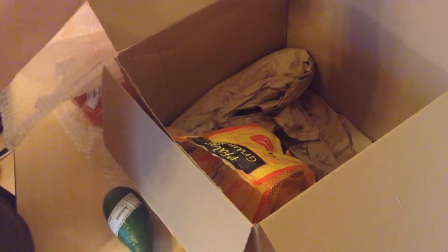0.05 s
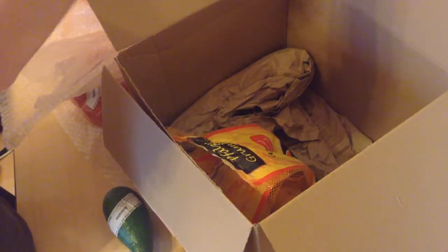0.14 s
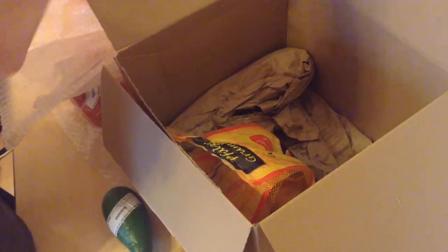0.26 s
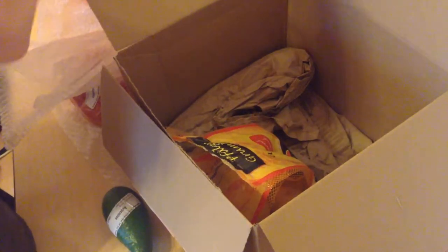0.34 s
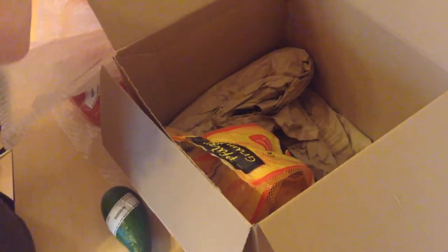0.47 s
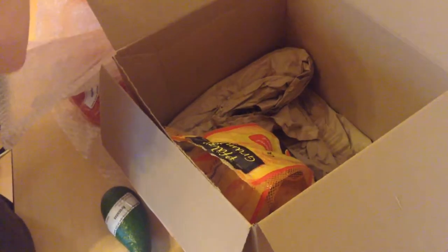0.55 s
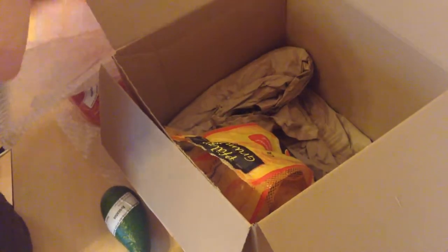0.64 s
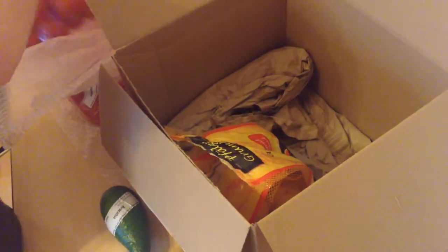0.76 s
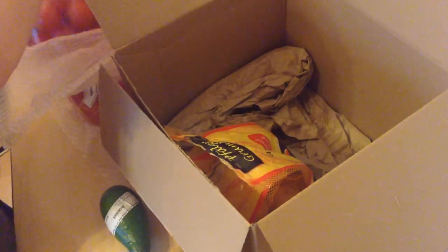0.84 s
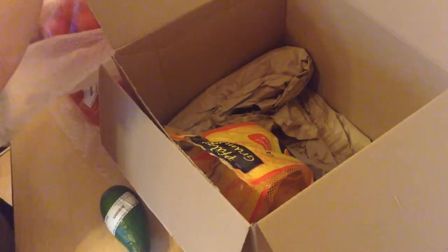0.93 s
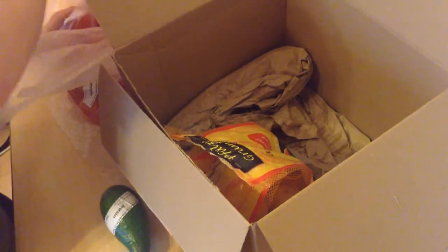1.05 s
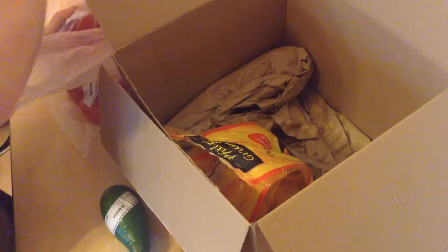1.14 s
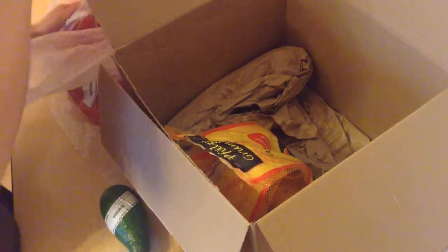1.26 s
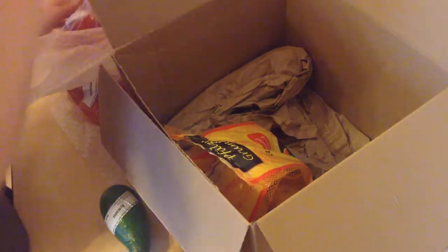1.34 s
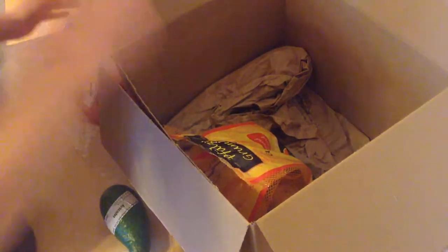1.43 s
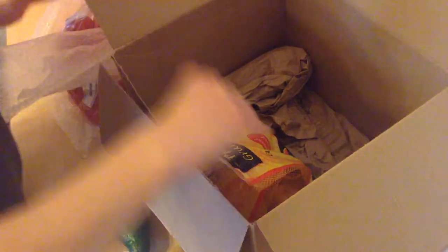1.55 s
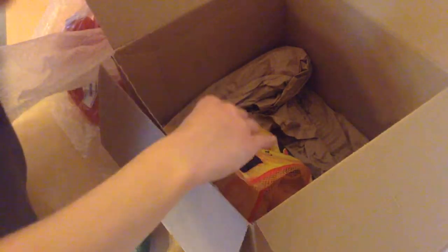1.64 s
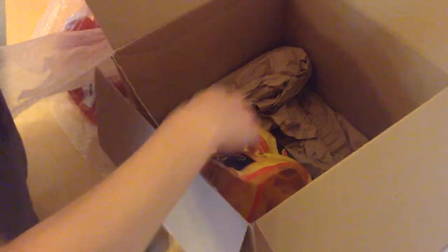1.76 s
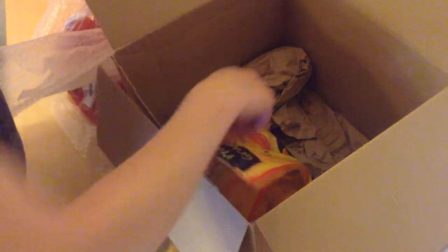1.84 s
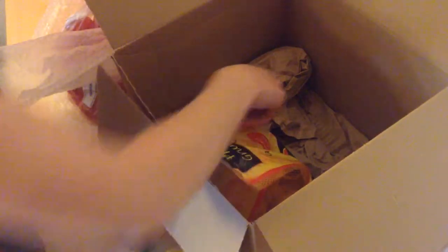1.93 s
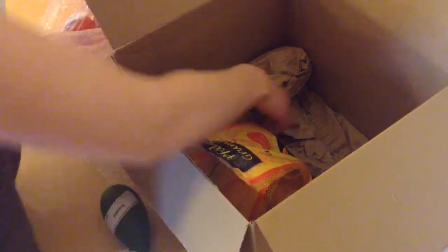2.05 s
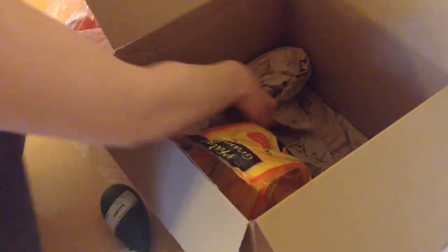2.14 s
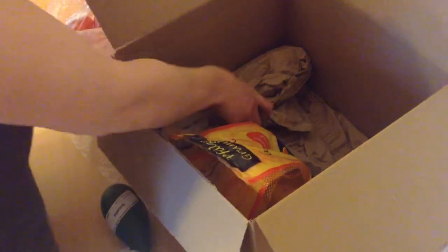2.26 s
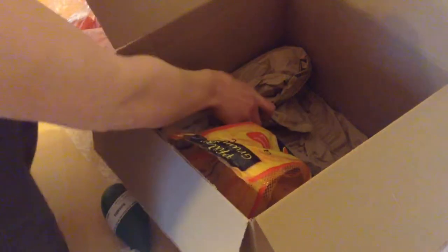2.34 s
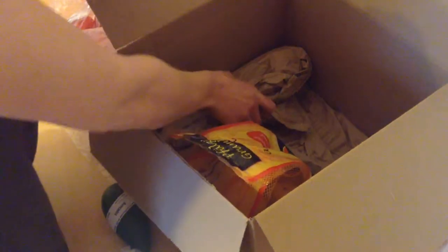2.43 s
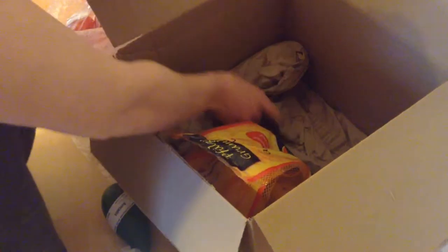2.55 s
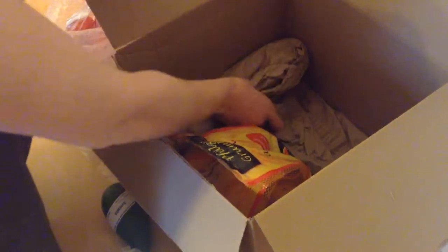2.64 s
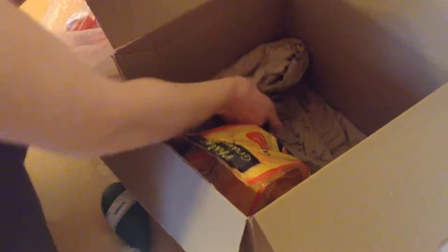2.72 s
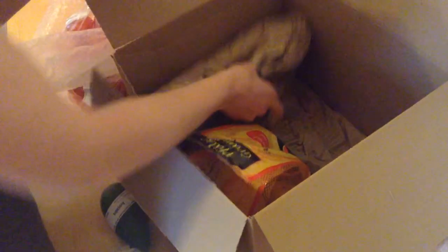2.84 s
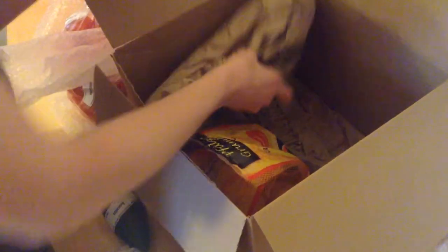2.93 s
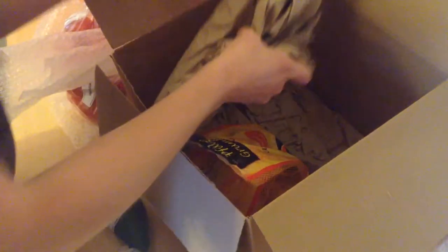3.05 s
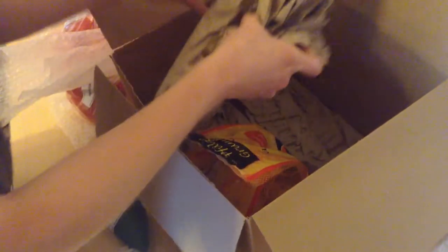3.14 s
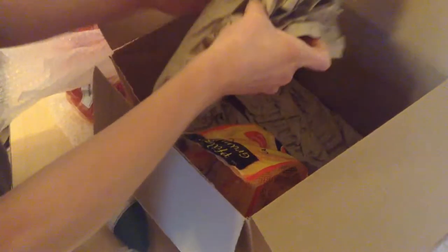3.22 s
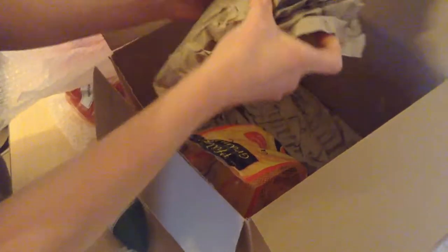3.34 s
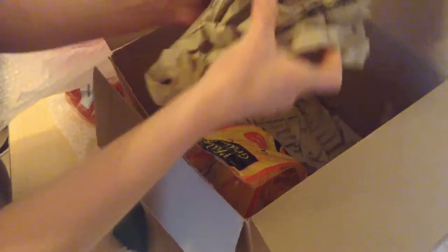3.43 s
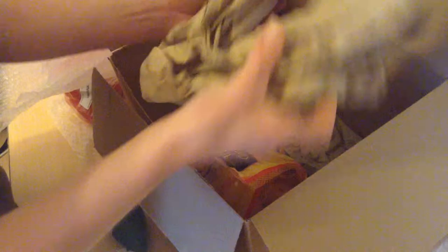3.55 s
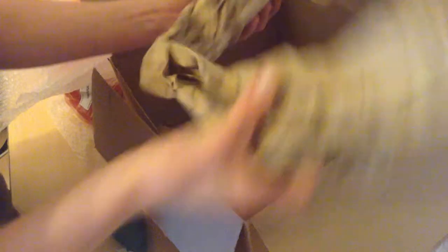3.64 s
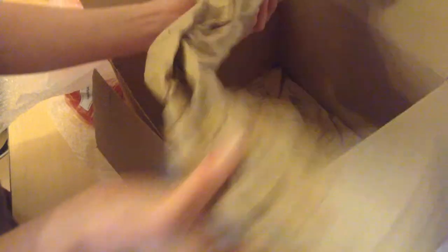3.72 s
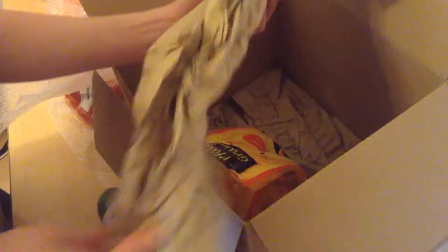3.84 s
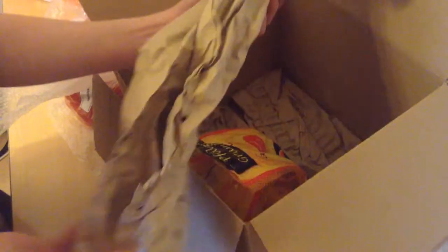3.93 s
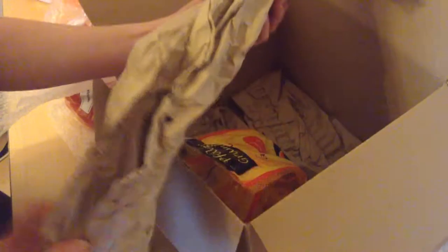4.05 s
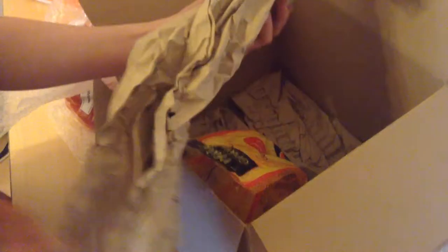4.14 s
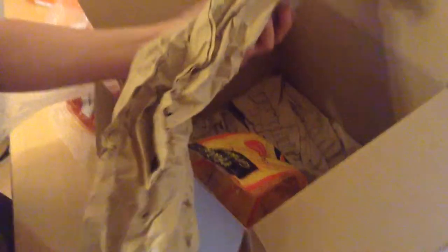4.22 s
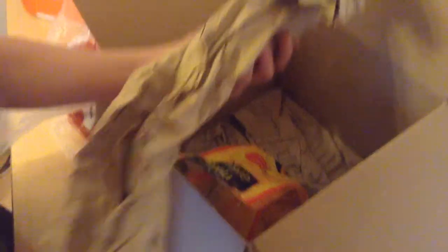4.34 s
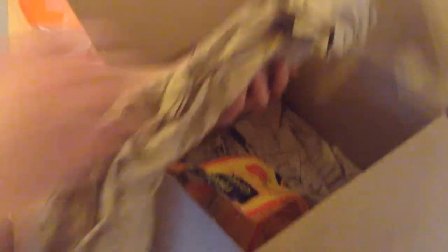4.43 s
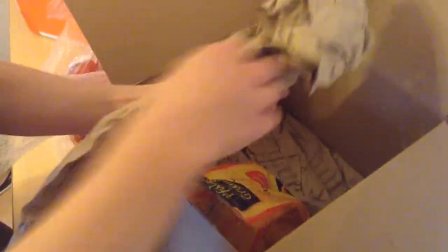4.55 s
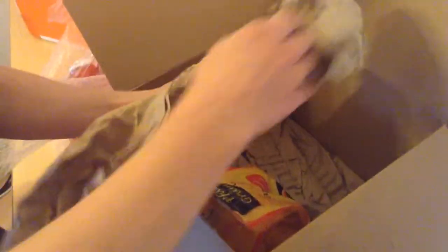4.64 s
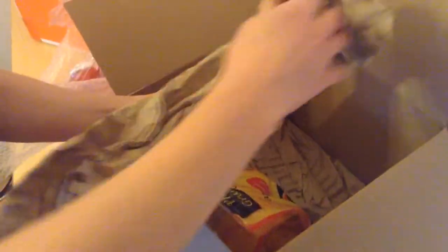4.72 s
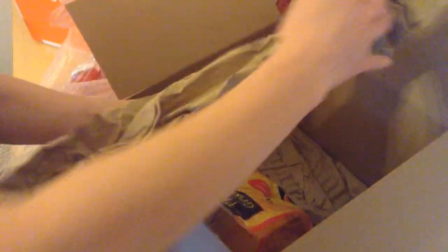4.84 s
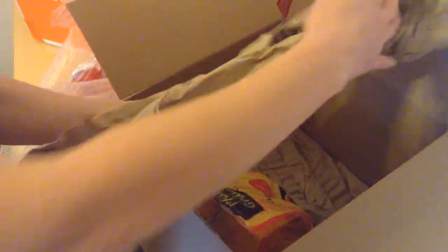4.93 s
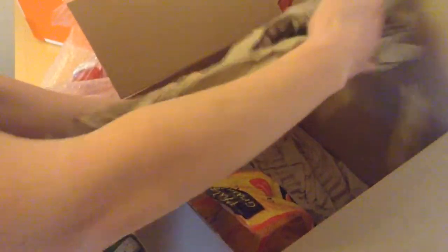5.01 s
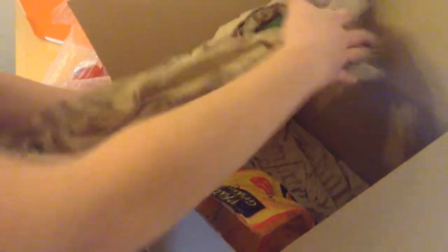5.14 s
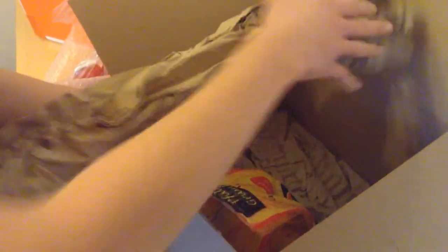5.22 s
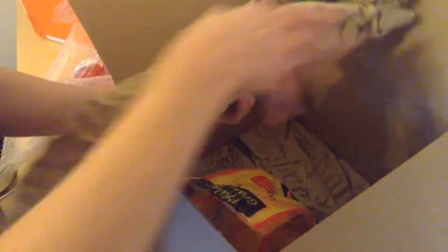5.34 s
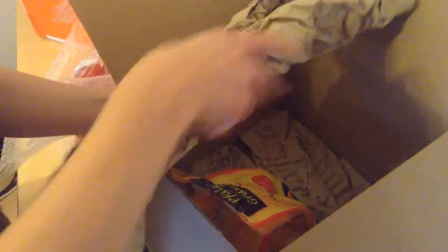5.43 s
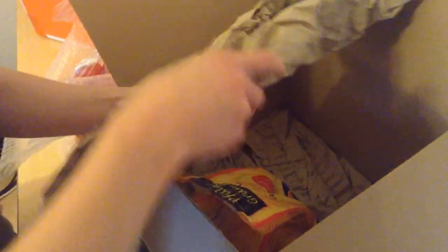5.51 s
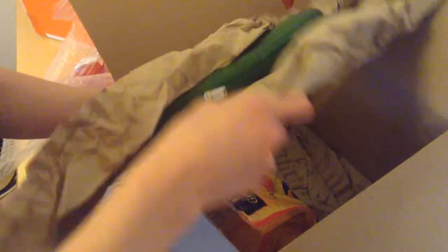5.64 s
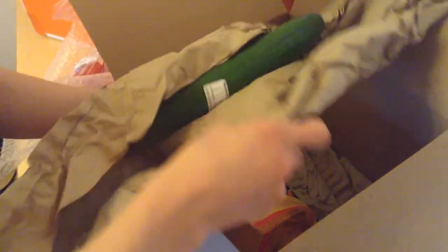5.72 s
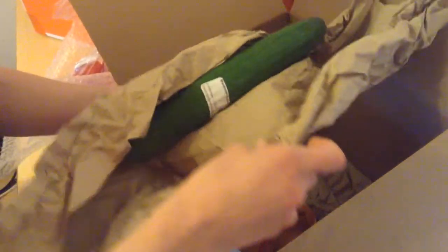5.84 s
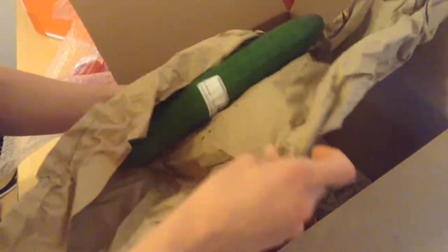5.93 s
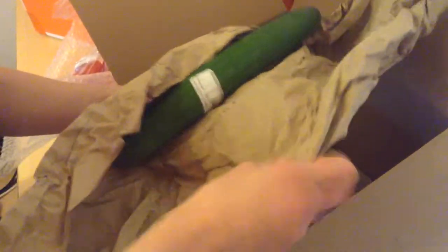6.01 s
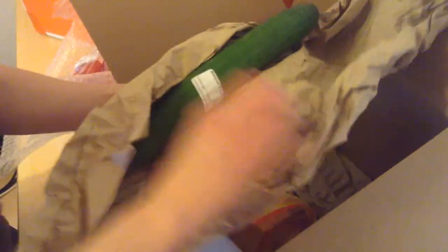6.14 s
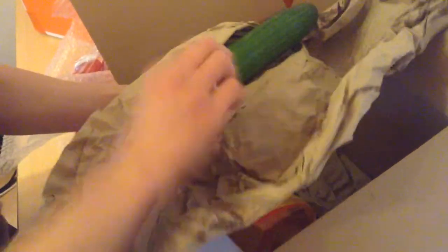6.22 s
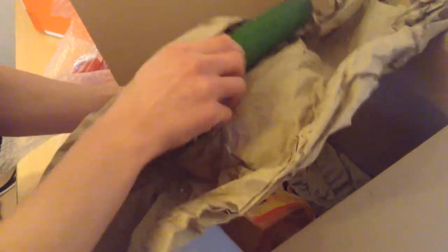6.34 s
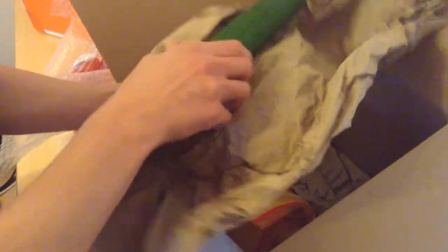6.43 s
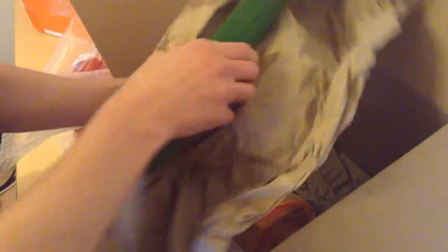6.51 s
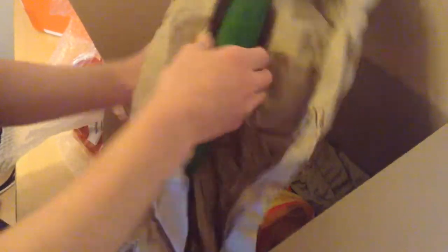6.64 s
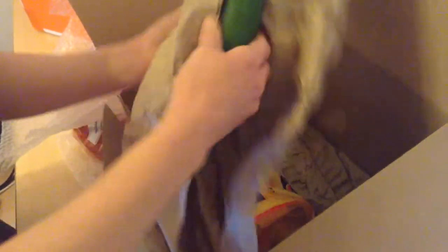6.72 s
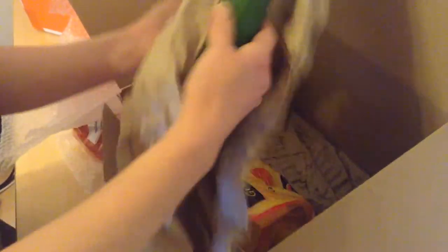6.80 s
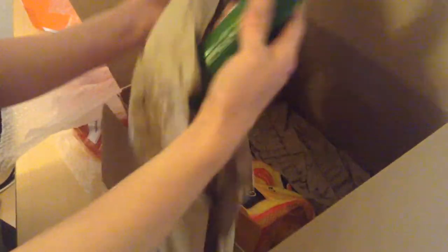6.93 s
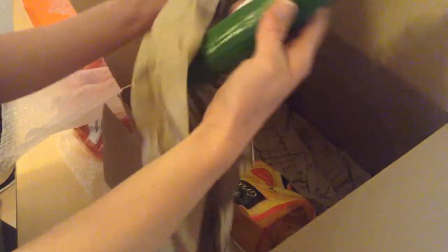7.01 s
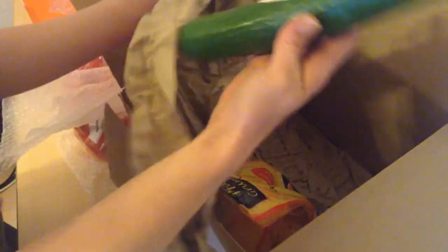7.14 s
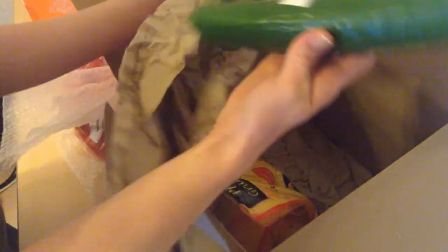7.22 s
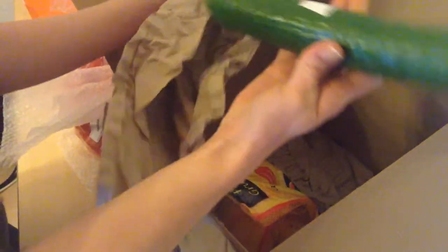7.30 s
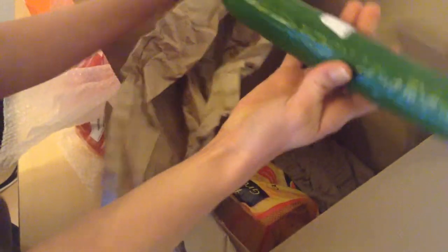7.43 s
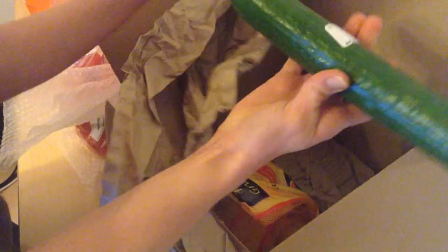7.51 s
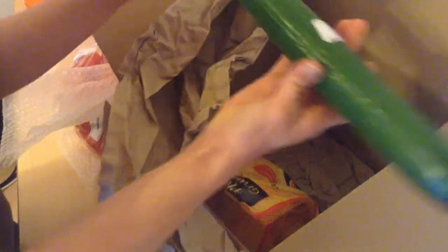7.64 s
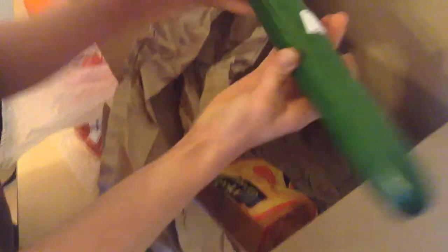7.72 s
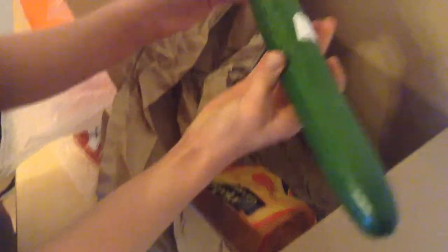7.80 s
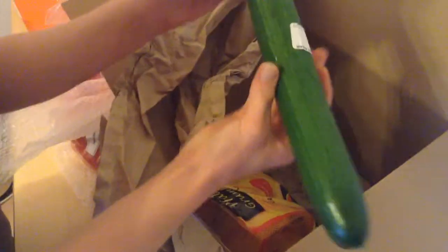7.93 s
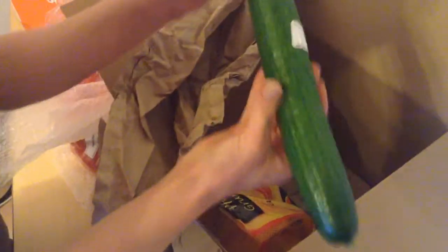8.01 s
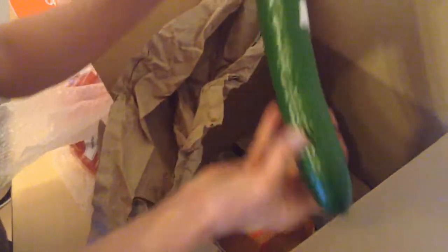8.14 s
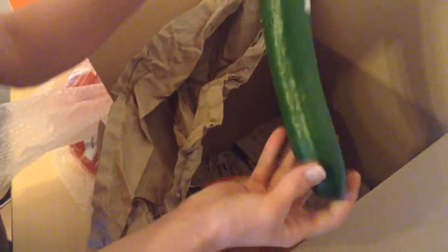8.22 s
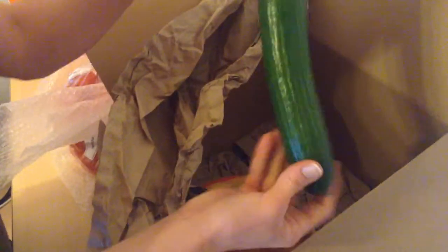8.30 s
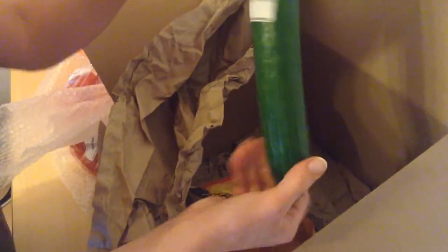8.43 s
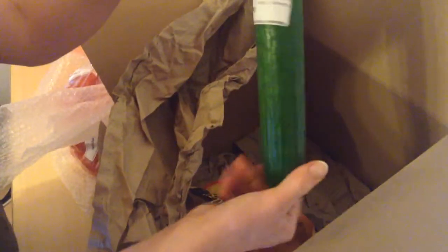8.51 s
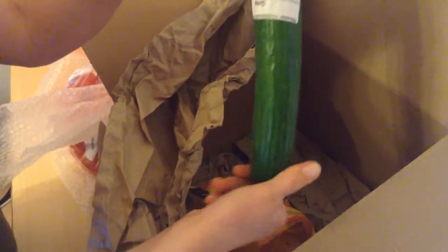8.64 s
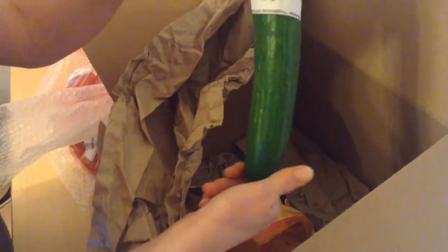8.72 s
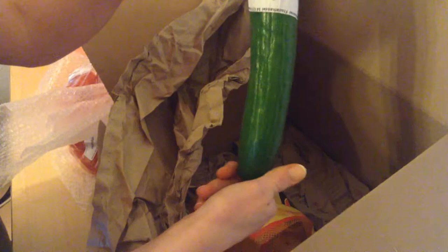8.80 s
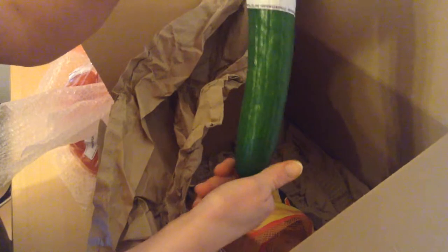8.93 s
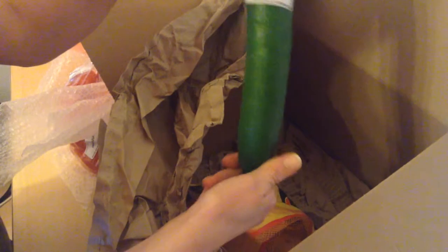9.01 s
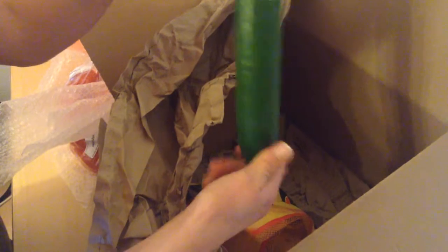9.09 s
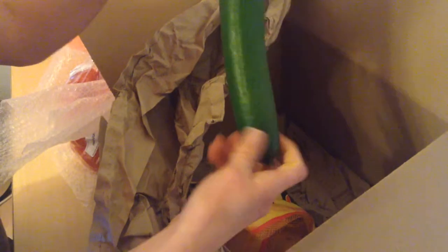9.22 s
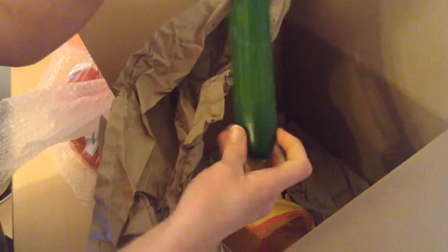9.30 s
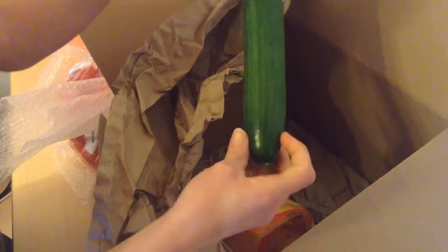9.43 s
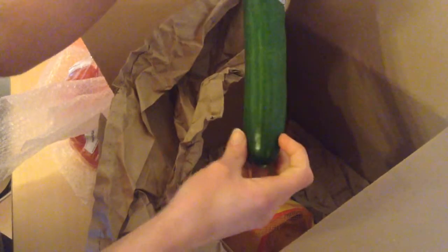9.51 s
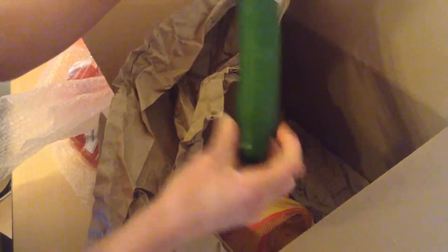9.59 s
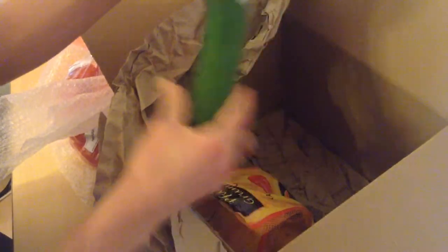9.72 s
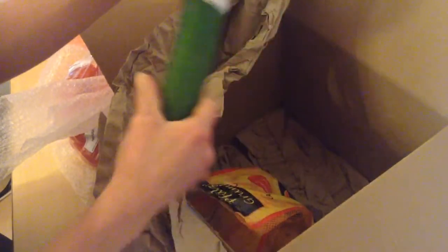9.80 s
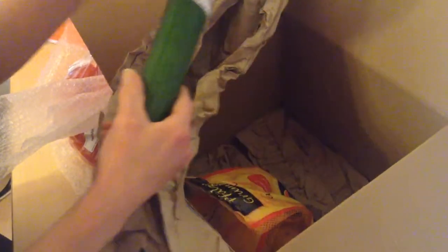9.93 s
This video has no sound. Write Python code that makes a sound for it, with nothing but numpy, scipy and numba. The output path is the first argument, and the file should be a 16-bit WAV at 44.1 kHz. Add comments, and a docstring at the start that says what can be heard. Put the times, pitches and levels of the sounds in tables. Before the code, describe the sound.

Hands pull crumpled packing paper about inside a cardboard box, close to the microphone in a quiet room. Light rustles grow into dense, irregular bursts of crackling with sharp snaps, while the sheet drags on the cardboard and hands knock hollowly against the walls. In the last quarter the paper mostly rests, leaving a few soft pats on a cucumber, faint crinkles and a low room hum.

```python
"""Packing paper in a cardboard box

Hands pull crumpled paper about, close to one microphone in a quiet room. Creases buckle in a dense
crackle with louder snaps, the sheet drags on the box and makes its walls boom, and hands knock the box.
In the pauses, palms pat a firm vegetable over the hum of the room."""
import sys
import numpy as np
from scipy import signal
from scipy.fft import rfft, irfft
from scipy.io import wavfile
from scipy.ndimage import uniform_filter1d
from numba import njit

SR = 44100
rng = np.random.default_rng(int(sys.argv[2]) if len(sys.argv) > 2 else 0)


def wrap_up_sound(samples):
    """Save the sound to the file named by the first command line argument, as 16-bit audio."""
    columns = np.atleast_2d(samples).T
    # keep every value between -1 and 1, then stretch to whole-number steps
    tamed = np.clip(columns, -1, 1)
    steps = np.round(tamed * 32767).astype(np.int16)
    wavfile.write(sys.argv[1], SR, steps)


N = 439236

# Levels in the tables are relative. A fade time is how long a sound takes to drop by 60 dB.
# Pulls, grabs and folds of the paper. Each row: start in seconds, length in seconds, crackle level in dB,
# its change by the end in dB, then boosts in dB for fine creases, broad folds and drag on the box.
PAPER_PULLS = [(0.087, 0.18, -58.5, 14.5, 2, -10, -19), (0.321, 0.097, -49, 12.5, 1.5, -12, -17),
               (0.514, 0.19, -51.5, 7, -1, -22, -22), (0.667, 0.34, -49, 0.5, -5.5, -7, -6.5),
               (0.977, 0.12, -39.5, -4, -4, -7, -25), (1.144, 0.21, -47.5, -1.5, 1.5, -7.5, -14.5),
               (1.575, 0.044, -53.5, -3, -25, 9, 10.5), (1.736, 0.15, -38.5, -3, 2.5, -1.5, -10),
               (2.014, 0.017, -42.5, 0, 5.5, -6, -7.5), (2.055, 0.11, -38, -1, 1, -5, -14),
               (2.221, 0.089, -43.5, -2, -23, 4, -4), (2.344, 0.063, -44.5, -0.5, -21, 2.5, -1),
               (2.442, 0.29, -34, -0.5, -15, -3.5, -16.5), (2.76, 0.022, -34.5, 2.5, 1, -11, -17.5),
               (2.998, 0.11, -42.5, -6.5, -4, -5, -10), (3.161, 0.065, -57, -2.5, -13, 5, -14),
               (3.251, 0.24, -47.5, 14, -4, -6, -21.5), (3.444, 0.23, -41.5, 6, -23, -7.5, -22.5),
               (3.715, 0.24, -33, -1, -26, -7, -22.5), (4.002, 0.22, -34.5, -9, -22, -8, -16),
               (4.387, 0.11, -66, 0, -18, -11, 0), (4.533, 0.13, -31, -0.5, -11, -9, -18.5),
               (4.734, 0.36, -38, 4.5, -9, -8, -19), (5.124, 0.36, -38.5, -19, -3, -8, -18),
               (5.409, 0.41, -42.5, 0, -4, -6, -15), (5.887, 0.14, -51, 18, -5, -9, -15.5),
               (6.083, 0.5, -43, 0, -5, -8.5, -16), (6.447, 0.35, -36, -2, -6, -5.5, -13.5),
               (6.842, 0.026, -40, -2, -4, -11, -16), (6.921, 0.23, -40, -1, -1.5, -14, -25),
               (7.112, 0.099, -36, -1, -5, -7.5, -33), (7.25, 0.28, -41, 0, -8, -6, -12),
               (7.976, 0.21, -68, 7, 5, -5, -4), (9.624, 0.14, -78.5, 16, -13, -14, 7),
               (9.864, 0.11, -52.5, -0.5, 0, -13, -17)]
# The tone of the paper sheet. Each row: frequency in Hz, level in dB.
SHEET_TONE = [(590, -22.5), (1000, -14.5), (1900, -9), (4200, -3.5), (6000, -10), (8600, -17), (12000, -25),
              (16000, -37)]
# Single creases buckling. Each row: start in seconds, level in dB, pitch in Hz, fade time in seconds.
CREASE_SNAPS = [(0.1584, -30, 4360, 0.051), (0.2236, -30, 7300, 0.021), (0.236, -25.5, 3380, 0.025),
                (0.394, -24.5, 4420, 0.026), (0.426, -25, 2300, 0.068), (0.6274, -28.5, 2400, 0.033),
                (0.993, -26.5, 3750, 0.24), (1.183, -27, 3900, 0.032), (1.5649, -25, 2430, 0.031),
                (1.726, -31, 3010, 0.08), (1.75, -21.5, 3820, 0.086), (1.765, -16, 3470, 0.02),
                (1.783, -22, 5050, 0.077), (1.803, -17, 3670, 0.035), (1.836, -16, 4600, 0.045),
                (1.849, -21, 3260, 0.056), (1.865, -18, 4240, 0.06), (1.88, -19, 4640, 0.035),
                (1.887, -15.5, 4750, 0.037), (2.009, -20, 1480, 0.013), (2.0575, -18.5, 3930, 0.13),
                (2.0745, -24, 2340, 0.03), (2.1644, -32, 7500, 0.016), (2.19, -20.5, 2100, 0.026),
                (2.227, -26, 1330, 0.038), (2.388, -33, 6500, 0.029), (2.45, -20.5, 2210, 0.19),
                (2.502, -14, 2780, 0.025), (2.5748, -20.5, 1810, 0.23), (2.631, -16, 4630, 0.04),
                (2.6683, -17, 3770, 0.015), (2.7102, -29, 3570, 0.028), (2.743, -18, 4300, 0.015),
                (2.7691, -35, 8550, 0.04), (2.814, -20, 5000, 0.014), (2.826, -36, 5500, 0.016),
                (2.898, -28, 3200, 0.11), (3.008, -24.5, 4200, 0.061), (3.164, -18.5, 3850, 0.015),
                (3.37, -26.5, 2670, 0.23), (3.455, -19.5, 4600, 0.49), (3.4966, -17, 5700, 0.065),
                (3.754, -8, 3010, 0.017), (3.863, -18.5, 2430, 0.032), (3.903, -16, 2000, 0.027),
                (3.999, -9, 2920, 0.016), (4.106, -19, 2700, 0.1), (4.181, -16.5, 2440, 0.012),
                (4.198, -22, 2500, 0.027), (4.219, -22, 4360, 0.018), (4.254, -22.5, 1620, 0.031),
                (4.2958, -22.5, 1520, 0.023), (4.3096, -27, 2270, 0.02), (4.3205, -34, 2300, 0.019),
                (4.3278, -28, 1560, 0.037), (4.345, -31.5, 1490, 0.016), (4.413, -42, 4525, 0.02),
                (4.494, -43, 1770, 0.032), (4.5246, -14.5, 4100, 0.029), (4.541, -25, 4270, 0.072),
                (4.555, -11, 3620, 0.038), (4.5637, -9, 2460, 0.022), (4.577, -24, 4060, 0.029),
                (4.613, -16, 4400, 0.044), (4.6214, -19.5, 1910, 0.18), (4.722, -30, 8500, 0.061),
                (4.869, -19.5, 1720, 0.077), (4.9352, -31, 8000, 0.03), (4.958, -16, 1620, 0.022),
                (4.976, -24, 4630, 0.02), (5.1285, -18.5, 4160, 0.1), (5.312, -28.5, 1800, 0.034),
                (5.4139, -19.5, 1400, 0.02), (5.545, -22, 2870, 0.053), (5.935, -29, 3880, 0.049),
                (6.4526, -11, 2170, 0.034), (6.4596, -16.5, 3860, 0.029), (6.564, -24, 1620, 0.066),
                (6.664, -22, 4300, 0.22), (6.695, -23, 3330, 0.12), (6.841, -30, 2610, 0.046),
                (6.9539, -22, 1400, 0.039), (6.9694, -29.5, 7800, 0.06), (7.177, -23.5, 1890, 0.14),
                (8.801, -30, 3760, 0.048), (9.4627, -43, 2840, 0.028), (9.855, -37, 2900, 0.041)]
# Blows on the box. Each row: start in seconds, level in dB, hardness in dB,
# fade time of the rattling flaps in seconds.
BOX_KNOCKS = [(0.41, -30.5, -8.5, 0.27), (0.625, -32.5, -3.5, 0.16), (0.764, -43.5, 4, 0.13),
              (0.865, -42.5, 0, 0.14), (0.996, -39, 4, 0.046), (1.562, -31, -2.5, 0.17),
              (2.074, -32.5, -18, 0.11), (2.191, -21, -12, 0.052), (2.24, -45, 12.5, 0.25),
              (2.409, -37, -2, 0.093), (2.458, -46, 8, 0.15), (2.56, -34, 3, 0.23),
              (3.382, -44, 8.5, 0.085), (3.994, -38, 3.5, 0.071), (4.529, -33.5, 1.5, 0.044),
              (4.606, -40, 0, 0.23), (4.959, -34, -16, 0.056), (6.62, -28.5, -24, 0.041),
              (6.855, -46, 9, 0.086), (6.961, -37.5, -4, 0.26), (7.109, -34, -23, 0.36),
              (7.552, -33.5, -7, 0.074)]
# The notes the box walls ring at. Each row: pitch in Hz, level in dB, fade time in seconds.
BOX_NOTES = [(165, -6.5, 0.06), (220, -4.5, 0.044), (349, -9, 0.046), (420, -6, 0.026), (648, -9, 0.03),
             (890, -11, 0.04), (988, 1.5, 0.027), (1080, -13.5, 0.022), (1330, -10, 0.039)]
# The vegetable meeting paper and palms. Each row: start in seconds, level in dB, pitch in Hz.
VEGETABLE_PATS = [(4.201, -33.5, 239), (4.235, -41, 298), (4.333, -35, 180), (4.358, -37.5, 264),
                  (4.395, -40, 358), (4.42, -38.5, 228), (7.705, -44, 224), (7.7272, -38.5, 240),
                  (7.7485, -38.5, 230), (7.77, -42, 260), (7.793, -36.5, 220), (7.8354, -35.5, 280),
                  (8.258, -39, 204), (8.787, -40.5, 230), (8.82, -40, 256), (9.244, -45, 258)]
# The tone of the background hum and hiss. Each row: frequency in Hz, level in dB.
HUM_TONE = [(60, -40), (115, -35), (145, -7.5), (190, -12.5), (255, 0), (330, -8), (480, -9), (640, -4.5),
            (870, -8.5), (1000, -14.5), (1400, -15.5), (2000, -19.5), (5000, -22), (15500, -30)]

GRAB_DB_PER_S, SETTLE_DB_PER_S = 1500, 155  # how fast the crackle starts, and dies after letting go
ROOM_FADE_S, ROOM_DB, HUM_DB = 0.59, -14, -59.5


def paper():
    """Pulled paper rustles, its fine creases and broad folds crackle, and its drag makes the box boom."""
    effort, fine_gain, fold_gain, drag_gain = pulls()
    moving = np.minimum(effort / undb(-54.5), 1) ** 2  # a nearly still sheet neither folds nor drags
    surge = undb(1.1 * wander(25))
    slide = undb(0.5 * wander(63)) * noise()
    # The flat patches between creases ring briefly.
    panels = unit(crackle(300, spread_db=1.32, lo_hz=1089, hi_hz=6100, sharpness=11.6, fade_s=0.072))
    creases = unit(crackle(450, 4.1, 1100, 15400, 0.69, 0.043))
    rustle = surge * (creases + undb(-4.5) * panels + undb(-1.5) * slide)
    sheet = shape_tone(rustle, SHEET_TONE)
    for lo_hz, hi_hz in ((900, 2580), (1900, 2760), (3400, 6800)):  # the tone shifts as the sheet bends
        sheet = sheet + (undb(1.7 * wander(20)) - 1) * band(sheet, lo_hz, hi_hz)
    sheet = sheet / np.std(band(sheet, 1500, 6000))
    fine = unit(band(crackle(400, 4.1, 3800, 8100, 3.3, 0.04) + undb(-27) * rustle, 5960, 14000))
    folds = unit(band(surge * crackle(500, 1.9, 455, 1400, 0.51, 0.029), 548, 2130))
    scrape = crackle(150, 0.89, 214, 435, 2.3, 0.0092)
    drag = unit(band(box_walls(scrape), 130, 1130))
    return (undb(-2) * effort * sheet + undb(-12) * fine_gain * fine
            + moving * (undb(-3.5) * fold_gain * folds + drag_gain * drag))


def pulls():
    """Loudness of sheet, fine creases, folds and drag: each pull grabs, drifts in level, then settles."""
    t, power = np.arange(0, N, 32) / SR, 1e-12
    for start, length, db, change_db, *boosts_db in PAPER_PULLS:
        drift = change_db * np.clip((t - start) / length, 0, 1)
        grab = GRAB_DB_PER_S * np.maximum(start - t, 0)
        settle = SETTLE_DB_PER_S * np.maximum(t - start - length, 0)
        layers_db = db + drift - grab - settle + np.array([0, *boosts_db])[:, None]
        power = power + undb(2 * layers_db)
    return [np.interp(np.arange(N) / SR, t, np.sqrt(layer)) for layer in power]


def crackle(per_second, spread_db, lo_hz, hi_hz, sharpness, fade_s):
    """Creases give way at random moments: many small, few large, each with its own pitch."""
    gap_dice, pitch_dice, size_dice, fade_dice = rng.random((16000, 4)).T
    start = np.cumsum(-np.log(1 - gap_dice)) / per_second
    hz = lo_hz * (hi_hz / lo_hz) ** pitch_dice
    size = undb(-spread_db * np.log(1 - .98 * size_dice)) * (start < N / SR)
    return bursts(start, size, hz, hz / sharpness, fade_s * (.5 + fade_dice), noise(), click=12.7)


def snaps():
    """A loud crease cracks and rings two neighbouring patches of paper; small ones add a high tick."""
    start, db, hz, fade_s = np.transpose(CREASE_SNAPS)
    each = np.ones(len(start))
    ring = bursts(start, undb(db - 10.5), hz, hz / 6.9, fade_s, noise(), click=4.2)
    # Small patches lie beside larger ones.
    beside_hz = hz * (1.34 + 0.36 * rng.random(len(start))) ** np.sign(3000 - hz)
    ring += bursts(start, undb(db - 13.5), beside_hz, beside_hz / 5.8, fade_s, noise(), click=4.4)
    crack = bursts(start, undb(db - 7), 0.94 * hz, 0.5 * hz, 1.18 * fade_s, noise(), click=1.0)
    tick_size = undb(db - 13) * (hz / 6000) ** 2.85
    tick = bursts(start, tick_size, 9000 * each, 7000 * each, 1.03 * fade_s, noise(), click=1.7)
    return band(ring + undb(-6.5) * crack, 360, 5800) + band(tick, 3700, 10800)


def knocks():
    """A blow on the box is a soft push plus a sharp tick; harder blows bring out the higher notes."""
    start, db, hard_db, fade_s = np.transpose(BOX_KNOCKS)
    each = np.ones(len(start))
    push = bursts(start, undb(db - 38.5), 310 * each, 300 * each, fade_s, noise(), click=4.1)
    tick_size = undb(db + hard_db - 30.5)
    tick = bursts(start, tick_size, 1000 * each, 1500 * each, 0.77 * fade_s, noise(), click=5.3)
    return box_walls(push + tick) + undb(-15) * tick


def box_walls(force):
    """Knocked or scraped, the cardboard walls ring at their own notes."""
    out = 0
    for hz, db, fade_s in BOX_NOTES:
        ring_step = np.exp(2j * np.pi * hz / SR - np.log(1000) / (fade_s * SR))
        out = out + undb(db) * signal.lfilter([1], [1, -ring_step], force).imag
    return out


def pats():
    """Each pat on the vegetable is a short, soft thud with a light tick of contact."""
    thuds, t = np.zeros(N), np.arange(1500) / SR
    rise_and_fall = (1 - np.exp(-t / 0.00092)) * np.exp(-t / 0.0022)
    for start, db, hz in VEGETABLE_PATS:
        i = int(start * SR)
        thuds[i:i + len(t)] += undb(db + 6.5) * rise_and_fall * np.sin(2 * np.pi * hz * t)
    start, db, hz = np.transpose(VEGETABLE_PATS)
    ticks = bursts(start, undb(db - 16), 7 * hz, 7.3 * hz, np.full(len(start), .015), noise(), click=3.0)
    return thuds + ticks


def room_echo(x):
    """A small furnished room gives a blurred echo that gets duller as it dies."""
    t = np.arange(SR // 2) / SR
    bright = rng.standard_normal(len(t))
    dull = signal.lfilter([.15], [1, -.85], bright)
    fade = undb(-60 * t / ROOM_FADE_S)
    tail = (dull * fade + 0.5 * bright * fade ** 2) * (t > .004)
    return undb(ROOM_DB) * signal.fftconvolve(x, tail / np.sqrt(np.sum(tail ** 2)))[:N]


def hum():
    """The room hums and the microphone hisses, wavering a little in level."""
    return undb(HUM_DB + 0.89 * wander(5.2)) * unit(shape_tone(noise(), HUM_TONE))


@njit
def bursts(start, size, hz, width_hz, fade_s, hiss, click):
    """Each burst is a click and a dying hiss ringing at one pitch; a narrow width gives a purer note."""
    out = np.zeros(len(hiss))
    for k in range(len(start)):
        damping = np.exp(-np.pi * width_hz[k] / SR)
        ring_step = damping * np.exp(2j * np.pi * hz[k] / SR)
        fade = np.exp(-np.log(1000) / (fade_s[k] * SR))
        gain, ring = size[k] * np.sqrt(1 - damping ** 2), 0j
        first = int(start[k] * SR)
        for i in range(first, min(len(out), first + int(fade_s[k] * SR))):
            ring = ring * ring_step + gain * (hiss[i] + click * (i == first))
            gain *= fade
            out[i] += ring.real
    return out


def shape_tone(x, table):
    """Turn frequencies up or down to follow a tone table."""
    hz, db = np.transpose(table)
    log_gain = np.interp(np.log(np.arange(1, 2050) * SR / 4096), np.log(hz), db) * np.log(10) / 20
    by_delay = irfft(log_gain)
    by_delay[1:2048] *= 2
    by_delay[2049:] = 0  # so ringing comes after a click, never before
    return signal.fftconvolve(x, irfft(np.exp(rfft(by_delay))))[:N]


def wander(per_second):
    """Glide from one random value to the next, mostly between -1 and 1."""
    hold = int(SR / per_second)
    return uniform_filter1d(np.repeat(rng.standard_normal(N // hold + 1), hold), hold // 2)[:N]


def band(x, lo_hz, hi_hz):
    return signal.sosfilt(signal.butter(2, [lo_hz, hi_hz], "bandpass", fs=SR, output="sos"), x)


def noise():
    return rng.standard_normal(N)


def undb(db):
    return 10 ** (np.asarray(db) / 20)


def unit(x):
    return x / np.sqrt(np.mean(x ** 2))


def scene():
    """Paper and box with their echo, plus pats and hum, the same in both channels."""
    near = paper() + snaps() + knocks()
    return np.tile(near + room_echo(near) + pats() + hum(), (2, 1))


def record(dry):
    """The microphone drops the deep bass and adds its own faint rumble; the highest treble is cut."""
    thinned = signal.sosfilt(signal.butter(5, 135, "highpass", fs=SR, output="sos"), dry)
    rumble = undb(-86.5) * unit(band(noise(), 61, 157))
    return signal.sosfilt(signal.ellip(10, .2, 70, 15450, fs=SR, output="sos"), thinned + rumble)


dry = scene()
out = record(dry)
wrap_up_sound(out)
```